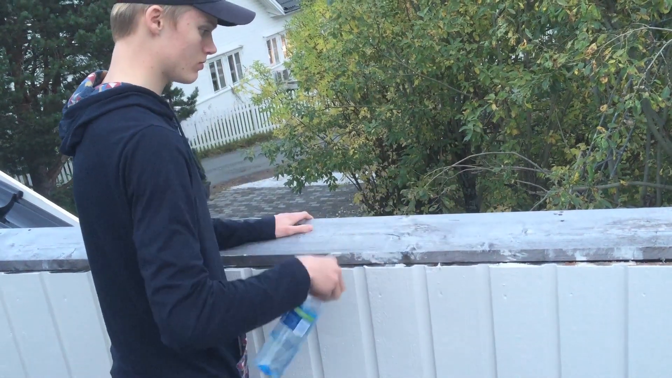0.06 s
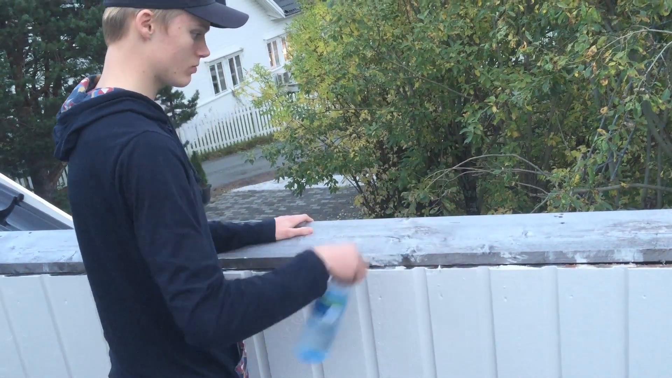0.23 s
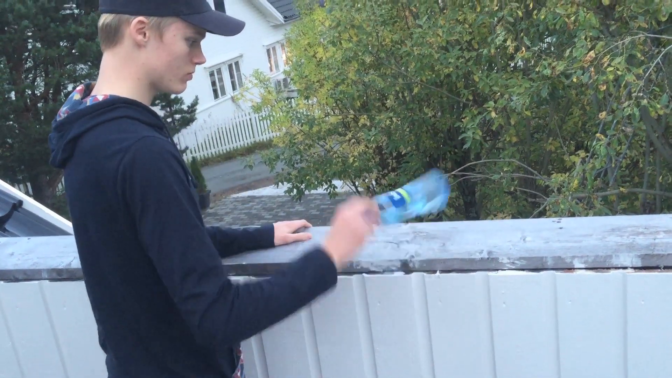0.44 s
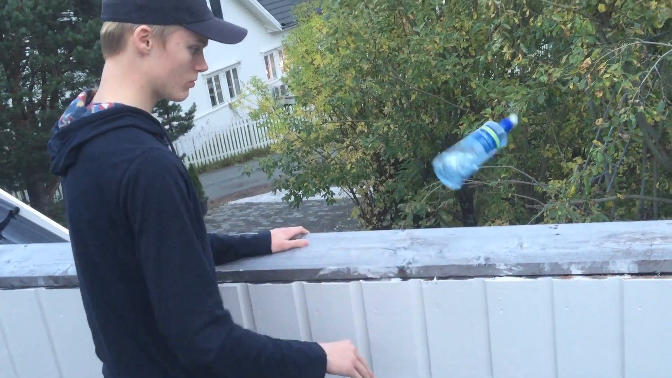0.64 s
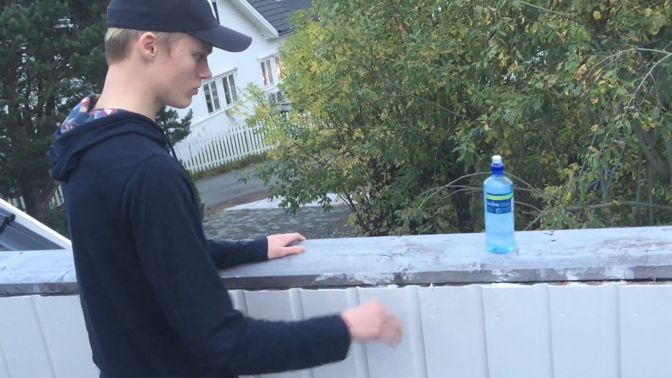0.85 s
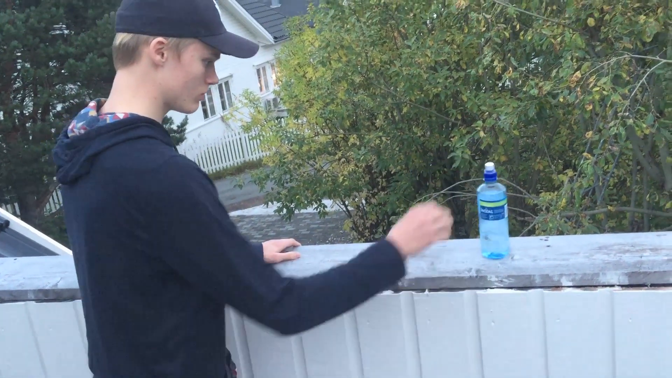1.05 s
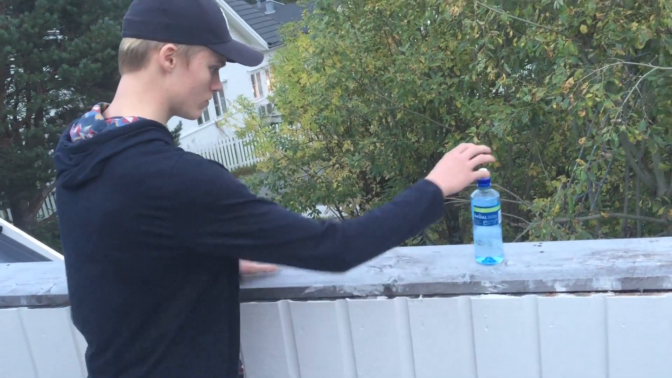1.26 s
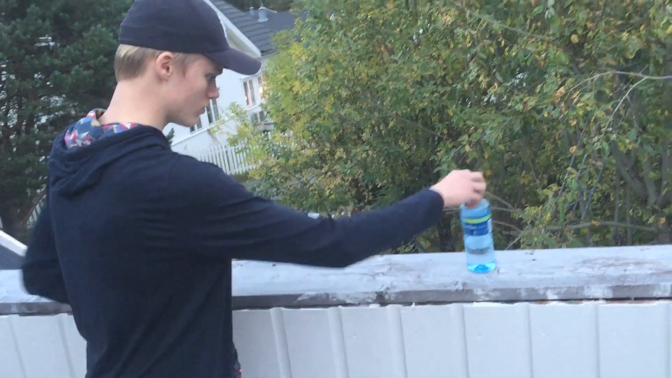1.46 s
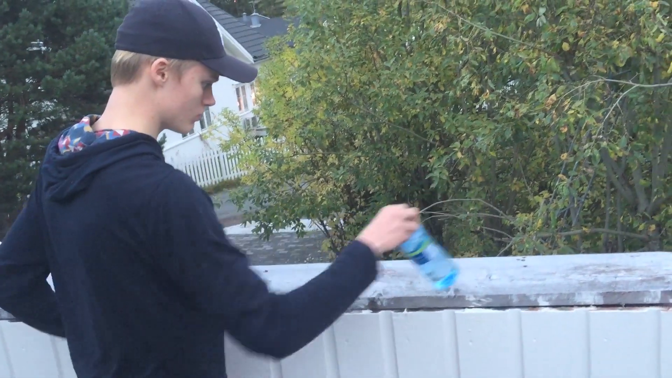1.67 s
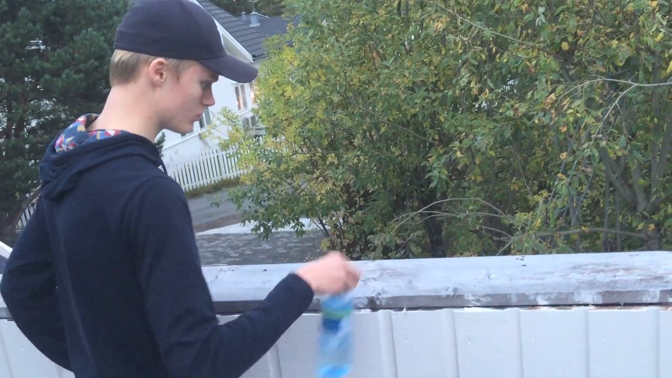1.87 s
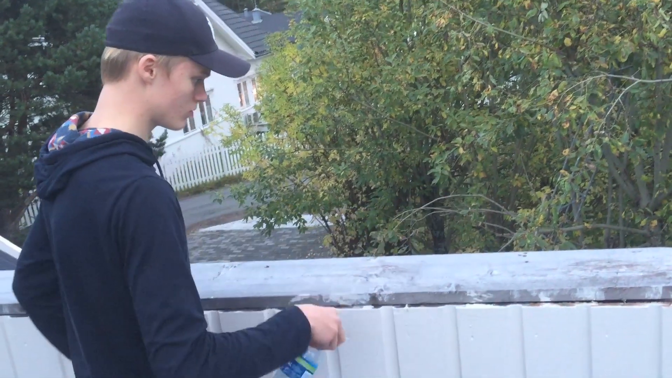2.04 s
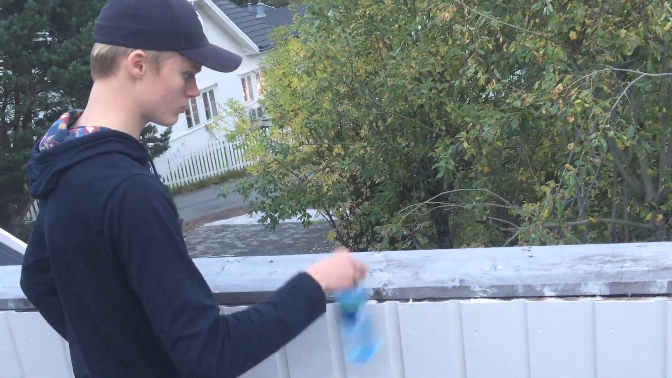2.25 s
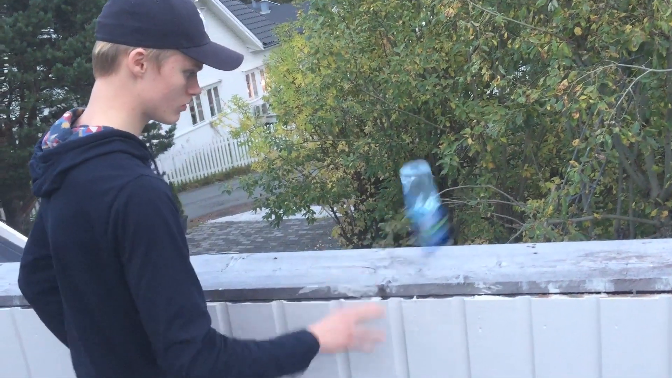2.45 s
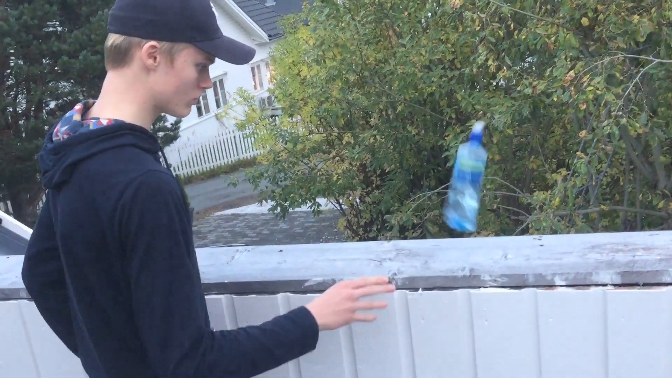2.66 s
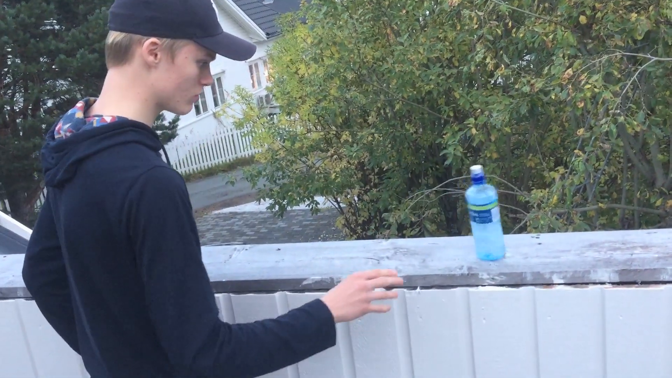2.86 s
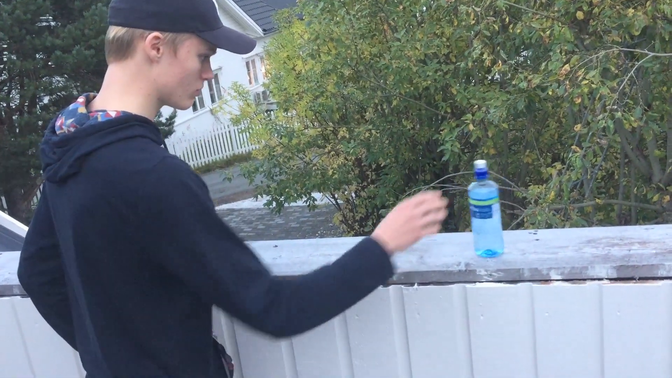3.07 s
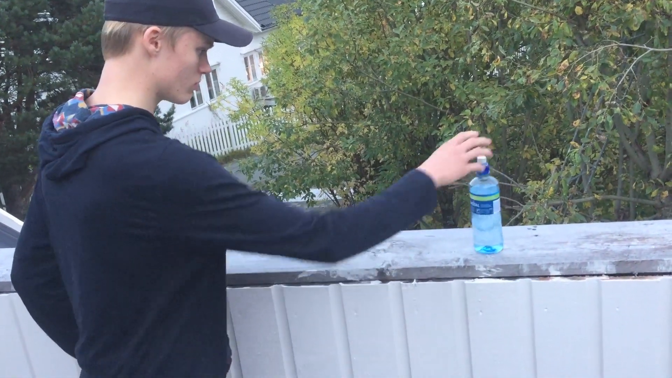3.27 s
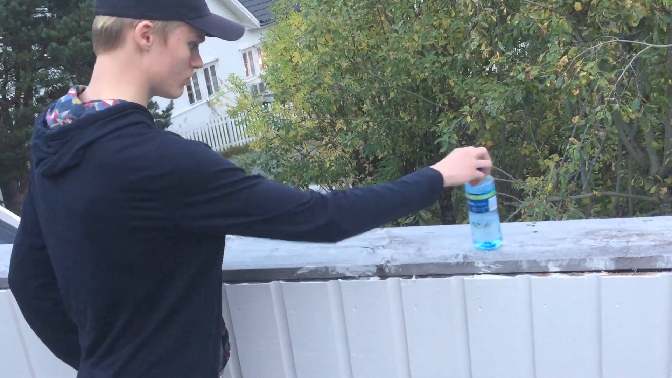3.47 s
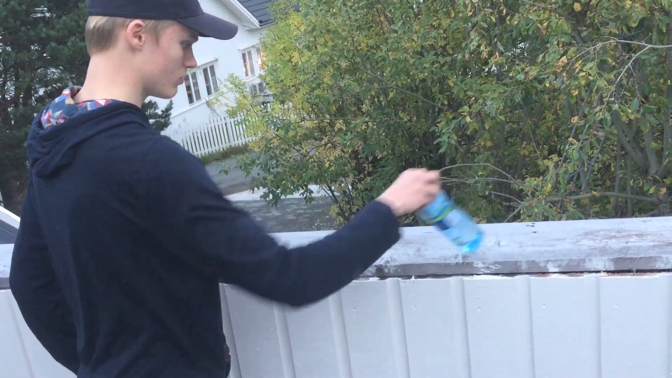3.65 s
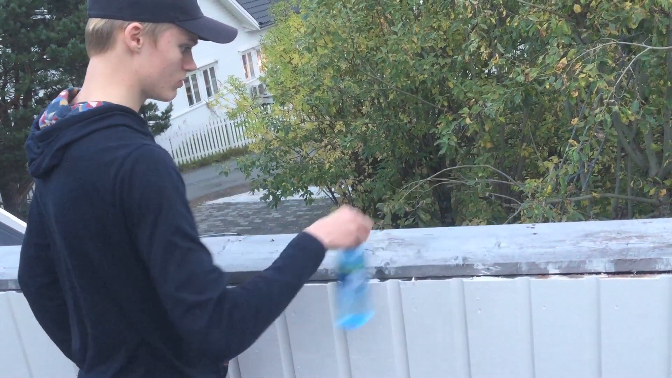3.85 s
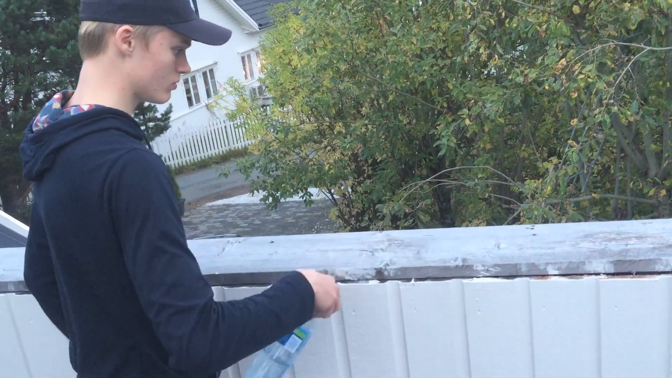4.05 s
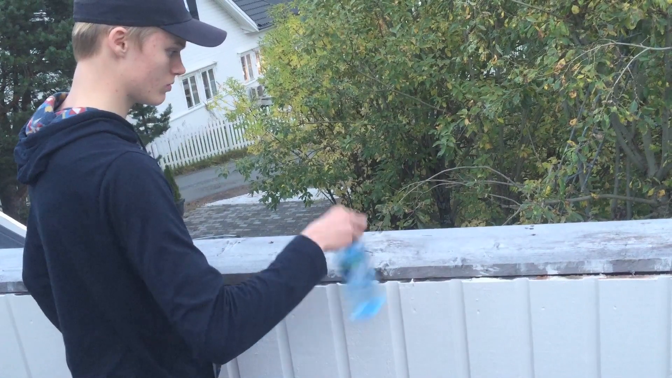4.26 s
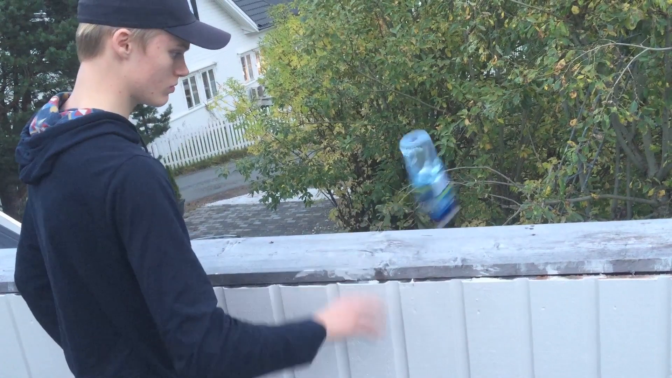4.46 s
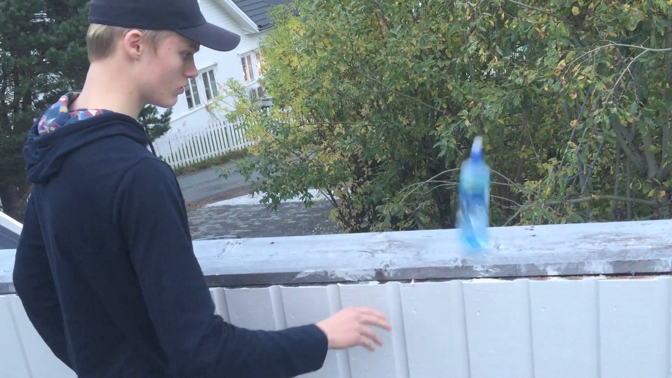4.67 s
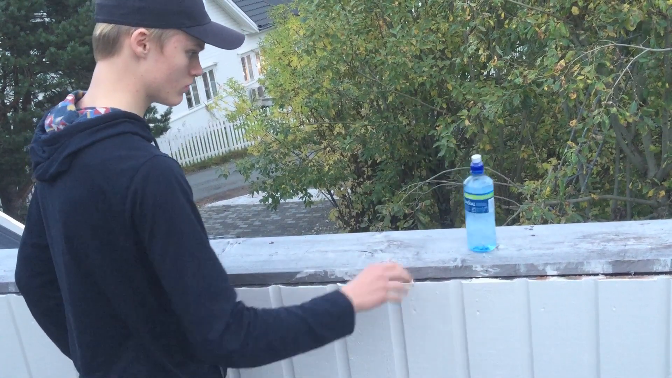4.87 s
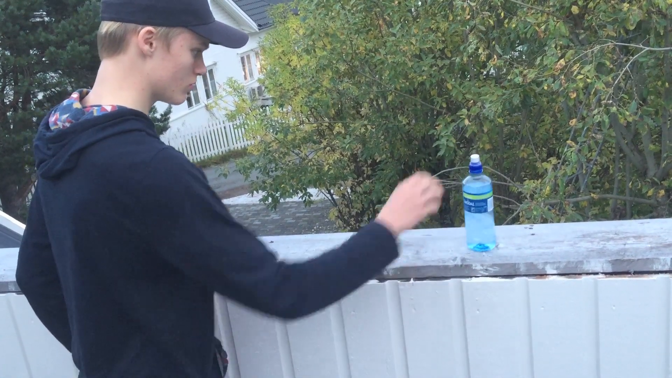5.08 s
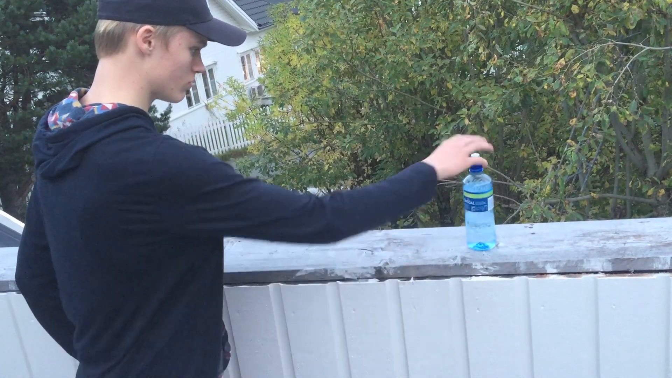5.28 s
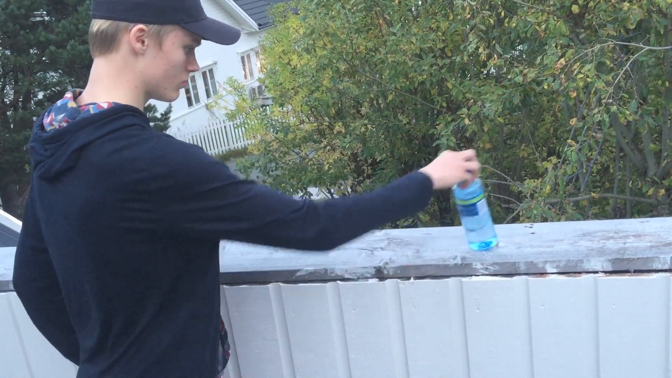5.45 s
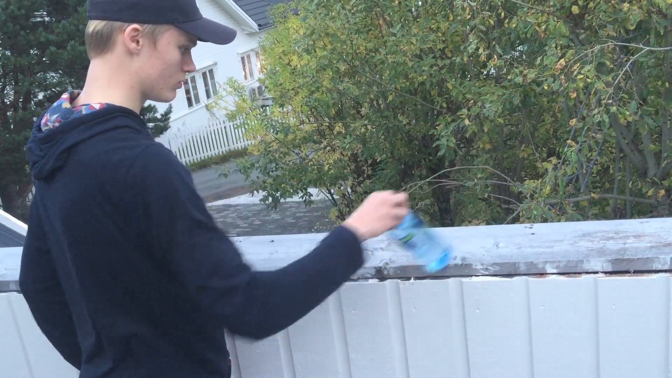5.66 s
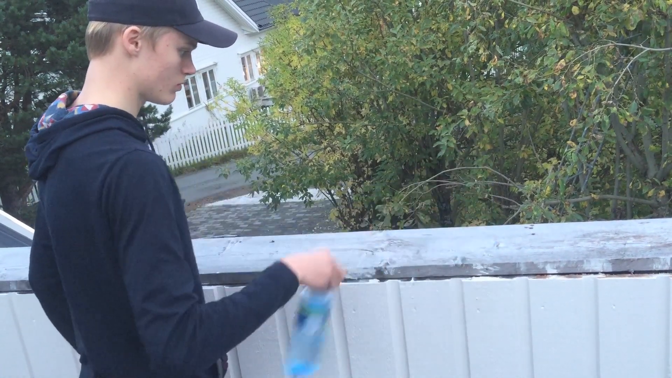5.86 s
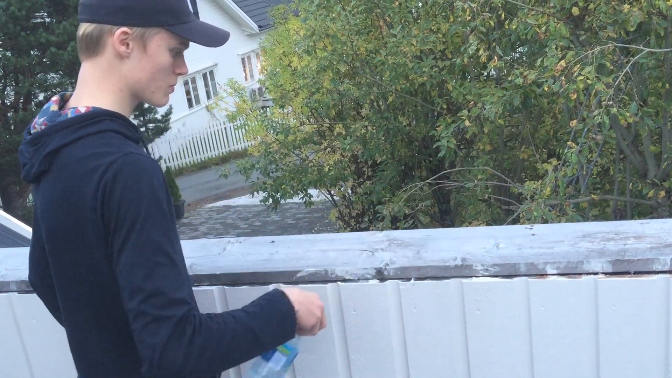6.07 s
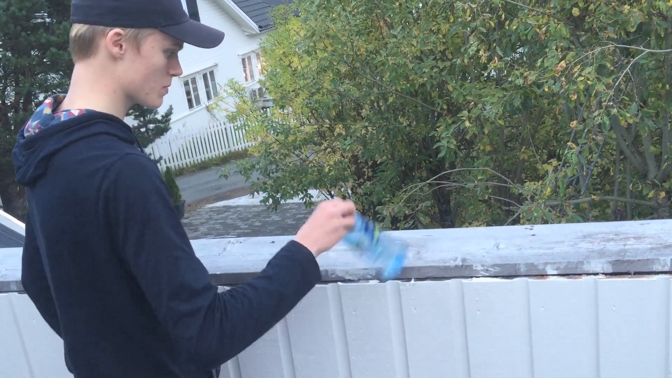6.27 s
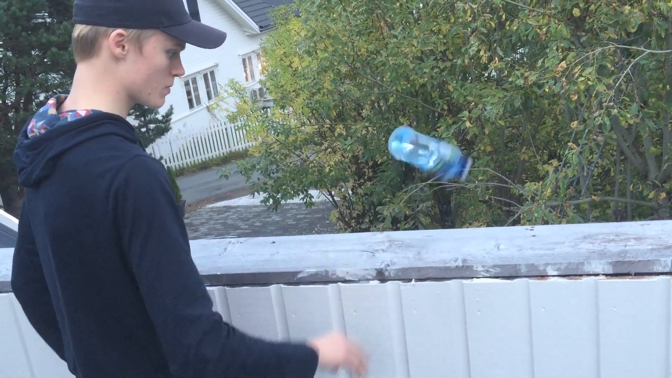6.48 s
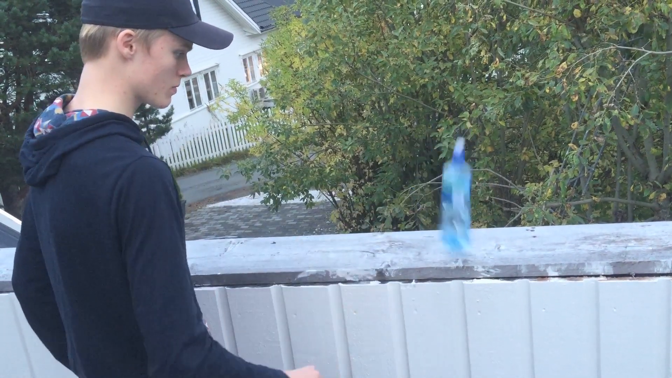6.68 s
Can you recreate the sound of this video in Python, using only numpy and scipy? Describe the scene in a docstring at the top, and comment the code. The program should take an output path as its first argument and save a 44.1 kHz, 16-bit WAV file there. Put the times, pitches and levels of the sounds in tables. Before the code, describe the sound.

Quiet outdoor air with soft, uneven distant road noise and a faint low engine hum that slows and fades by about 2.3 seconds. At 0.6 to 0.8 seconds, light water slaps and small hisses come from a tossed plastic bottle. At 0.94 it lands on a wooden fence top: a very sharp plastic crack, hollow low boom, splashy burst and brief panel shake, with tiny rocking knocks. Around 1.1 to 1.3 there is a barely audible sinking tone and a finger swish. Water slaps again at 2.55 to 2.7, then a second landing at 2.87, softer and duller, more thud than crack, with faint knocks trailing past 3 seconds. Sparse ticks follow. Sloshing at 4.4 to 4.75 precedes the third landing at 4.86, a bright, hard clatter of several contacts with a woody boom. Small settling knocks fade by 5.2. Quiet road noise remains until a fourth throw sloshes from 6.5 to 6.7, with no landing.

```python
"""In a yard, a part-filled plastic bottle is flipped onto the top board of a wooden fence: three landings and
a fourth throw. The base cracks on the board and the fence booms, both as struck banks of decaying sines, while
posts and panels shake on as dying noise. Water and fingers make slaps (short bubble rings with grit), hollow
bonks (pairs of decaying sines), hisses (shaped noise) and one faint sinking tone. Behind them lie distant road
noise, patchy and slowly swelling, and an engine rumble of two wavering sines that slows and fades."""
import sys
import numpy as np
from scipy import signal
from scipy.io import wavfile
from scipy.ndimage import uniform_filter1d

SR = 44100
rng = np.random.default_rng(int(sys.argv[2]) if len(sys.argv) > 2 else 0)


def wav_record(signal):
    """Record a signal, one row per channel, as 16-bit PCM in the file named by sys.argv[1]."""
    frames = np.transpose(np.atleast_2d(signal))
    bounded = np.clip(frames, -1, 1)
    # unit amplitude maps onto the largest positive 16-bit level
    quanta = np.round(bounded * 32767).astype(np.int16)
    wavfile.write(sys.argv[1], SR, quanta)


def makeup_ratio(level_db):
    """Linear amplitude ratio for a level in decibels (20 dB per factor of ten)."""
    decades = np.asarray(level_db, float) / 20
    return 10 ** decades


N = 296352


def evened(x):
    """Power normalisation: scales to rms 1."""
    return x / np.sqrt(np.mean(x ** 2) + 1e-20)


def peaked(x, db):
    """Peak normalisation: scales to a peak level in dB."""
    return makeup_ratio(db) * x / abs(x).max()


def read(points, hz):
    """Logarithmic pitch scale: interpolates a table along log frequency."""
    f, value = np.transpose(points)
    return np.interp(np.log(hz + 1), np.log(f + 1), value)


def add(mix, s, sound):
    """Superposition: adds a sound to the mix from time s."""
    part = mix[round(s * SR):][:len(sound)]
    part += sound[:len(part)]


def noise(count, shape, size):
    """Spectral shaping: random short-time spectra under the magnitude shape(hz, t)."""
    hop = size // 4
    frames = count // hop + 5
    hz = np.fft.rfftfreq(size, 1 / SR)[:, None]
    t = np.arange(frames) * hop / SR
    real, imaginary = rng.standard_normal((frames, len(hz), 2)).T
    spectra = (real + 1j * imaginary) * shape(hz, t)
    return signal.istft(spectra, nperseg=size, noverlap=size - hop)[1][:count]


def patches(hz, t, bins, frames):
    """Random modulation: rms-1 patches, smoothed over so many frequency bins and time frames."""
    grain = rng.standard_normal((len(t), len(hz)))
    across = uniform_filter1d(grain, size=bins, axis=1)
    return evened(uniform_filter1d(across, size=frames, axis=0)).T


def ring(modes, count, weight=lambda hz: 1, sense=1):
    """Modal synthesis: sums decaying sines; mode k is scaled by sense ** k, so a negative sense alternates signs."""
    t = np.arange(count) / SR
    total = np.zeros(count)
    for k, (hz, db, t60) in enumerate(modes):
        total += sense ** k * weight(hz) * makeup_ratio(db - 60 * t / t60) * np.sin(2 * np.pi * hz * t)
    return total


def favour(ring_hz, rest, spread):
    """Point excitation: the spot struck drives the modes near one pitch more than the rest."""
    return lambda hz: rest + np.exp(-(np.log(hz / ring_hz) / spread) ** 2)


def lasting(t60, hz):
    """Frequency-dependent damping: scales a time given for 2 kHz; higher rings die sooner."""
    return t60 * (hz / 2000) ** -0.34


# The base of the bottle snapping on the board, edge by edge. Each row: start in seconds, peak level in dB,
# most strongly excited ring in Hz, grit peak in dB relative to the ring.
BASE_CRACKS = [(0.9407, -14.5, 3500, 2), (0.9411, -4.5, 1870, -9), (.9428, -8.5, 851.4, -15),
               (.956, -24, 2820, -9), (0.962, -19, 2300, -8.5), (0.97, -24.5, 2850, -7),
               (.981, -29, 1495, -11.5), (2.8737, -28, 2700, 5), (2.876, -19.5, 930, -13.5),
               (2.8782, -19, 2100, -7.5), (2.89, -29, 1666, -16), (2.894, -34, 3300, -2),
               (2.913, -34, 2500, -9), (2.921, -41.5, 2140, -8), (4.857, -14.5, 5500, -5),
               (4.858, -12.5, 1870, -16.5), (4.8583, -13.5, 3725, -12), (4.861, -15, 1490, -19.5),
               (4.869, -16.5, 1490, -15), (4.881, -19, 1607, -13.5), (4.892, -31.5, 1900, -10)]
# Modes of the plastic base. Each row: frequency in Hz, level in dB before the strike weights it,
# free decay time (t60) in seconds.
BASE_MODES = [(726, -10, 0.047), (930, -3.5, 0.11), (1312, -6, 0.041), (1490, -10.5, 0.05),
              (1870, -4, 0.019), (2300, -5.5, 0.01), (2700, -6.5, 0.026), (3140, -11, 0.016),
              (3600, -10, 0.03), (3900, -12, 0.016), (5370, -4, 0.022), (6140, -3.5, 0.0095),
              (6800, -17, 0.034), (8720, 5.5, 0.0019), (11640, -11, 0.0052), (14600, -30.5, .006)]
CRACK_S = 0.023  # time scale of a crack at 2 kHz; each part decays in its own proportion to it


def cracks(mix):
    """Impact excitation: a sharp contact with a little chatter rings the plastic; grit on the board spits."""
    t = np.arange(3000) / SR
    draws = rng.standard_normal((len(BASE_CRACKS), 2, len(t)))
    for (s, db, ring_hz, grit_db), (chatter, grit) in zip(BASE_CRACKS, draws):
        scale_s = lasting(CRACK_S, ring_hz)
        contact = (t == 0) + 0.45 * chatter * makeup_ratio(-60 * t / (0.43 * scale_s))
        plastic = ring(BASE_MODES, len(t), favour(ring_hz, 0.1, 0.26), sense=-1.02)
        body = signal.fftconvolve(contact, plastic)[:len(t)] * makeup_ratio(-15 * t / scale_s)
        spit = signal.lfilter([1], [1, -0.4], grit) * makeup_ratio(-60 * t / (0.13 * scale_s))
        add(mix, s, peaked(peaked(body, 0) + peaked(spit, grit_db), db))


# The weight of the water pushing on the board, at landing and as the bottle rocks. Each row: start in seconds,
# peak level in dB before the bass cut, most strongly excited ring in Hz.
WATER_KNOCKS = [(.943, -10, 230), (.948, -11, 480), (0.951, -9.5, 340), (.957, -18.5, 125),
                (0.964, -11.5, 390), (0.974, -26.5, 122), (0.99, -23.5, 122), (1.02, -35.5, 315),
                (1.044, -38, 97), (1.071, -45, 122), (1.109, -46, 110.4), (1.151, -38.5, 182),
                (1.191, -45, 110.9), (1.24, -52, 150), (2.879, -18.5, 212), (2.8854, -12, 112.3),
                (2.894, -17, 240), (2.919, -17.5, 315), (2.937, -20.5, 122), (2.971, -30.5, 122),
                (3.011, -33, 180), (3.06, -31.5, 110.4), (3.12, -40, 180), (3.181, -42.5, 169.2),
                (3.25, -42.5, 101), (3.298, -43.5, 97), (3.392, -51, 97), (3.445, -48, 130),
                (3.522, -45.5, 103.6), (4.861, -16.5, 212), (4.869, -13, 212), (4.879, -15.5, 132.4),
                (4.890, -16, 315), (4.901, -18, 385), (4.922, -24, 131), (4.949, -36, 97), (4.99, -49, 131),
                (5.038, -36, 202.3), (5.082, -38.5, 150), (5.131, -40.5, 180), (5.188, -45, 97),
                (5.509, -52.5, 68.54)]
# Modes of the fence. Each row: frequency in Hz, level in dB before the push weights it, decay time (t60) in seconds.
FENCE_MODES = [(66, -13, 0.24), (97, -6, 0.083), (122, -0.5, 0.15), (150, -11.5, 0.43), (180, -8, 0.45),
               (212, -4, 0.09), (240, -11.5, 0.14), (262, -8, 0.073), (315, -1.5, 0.23), (340, -2.5, 0.09),
               (385, -3.5, .12), (435, -12, 0.1), (490, -3.5, 0.13), (530, -16.5, 0.03), (610, -9.5, .08),
               (620, -20.5, 0.073)]
HARD_MS, DOUBLING_DB = 0.8, 16  # contact time at 0 dB, and the drop in level that doubles it


def knocks(mix):
    """Contact-time filtering: a half-sine push rings the fence; a longer contact leaves only the low modes."""
    bass_cut = signal.butter(2, 70, "high", fs=SR, output="sos")  # the knocks carry little deep bass below 70 Hz
    for s, db, ring_hz in WATER_KNOCKS:
        contact_ms = HARD_MS * 2 ** (-db / DOUBLING_DB)
        samples = SR * contact_ms / 1000
        push = -np.sin(np.pi * np.arange(0.5, samples) / samples)  # first away from the microphone
        board = ring([(230, 2.2, 0.014)], 22000)  # the top board bends once and stops
        fence = ring(FENCE_MODES, len(board), favour(ring_hz, 0.13, 0.09))
        both = signal.fftconvolve(board + fence, push)
        add(mix, s, signal.sosfilt(bass_cut, peaked(both, db)))


# Posts and panels shaking on after each landing. Each row: start in seconds, level in dB
# (rms of the first 2000 samples before the soft onset), factor on the decay times.
FENCE_SHAKES = [(.945, -28, 1.2), (2.882, -30.5, 1.23), (4.862, -28.5, 1.2)]
# Spectrum of the shaking. Each row: frequency in Hz, relative level in dB per Hz.
SHAKE_SPECTRUM = [(35, -39.5), (60, -11.5), (97, -4), (138, 0.5), (259, -16), (329, -5.5), (665, -29.5),
                  (831, -29), (911, -21), (1040, -32.5), (1810, -31.5), (2060, -34), (4000, -41.5),
                  (5000, -48.5), (6500, -77), (11000, -120)]
# Damping of the shaking. Each row: frequency in Hz, decay time (t60) in seconds before the factor.
SHAKE_DECAY = [(60, 0.53), (160, 0.3), (400, 0.24), (900, 0.31), (2000, 0.11), (5000, 0.16)]


def shakes(mix):
    """High modal density: with too many panel modes to count, the tail is noise that dies band by band."""
    t = np.arange(SR) / SR
    onset = 1 - np.exp(-t / 0.0024)
    for s, db, longer in FENCE_SHAKES:
        def dying(hz, u):
            return makeup_ratio(read(SHAKE_SPECTRUM, hz) - 60 * u / (longer * read(SHAKE_DECAY, hz)))

        tail = noise(SR, dying, size=512)
        add(mix, s, makeup_ratio(db) * tail / tail[:2000].std() * onset)


# Water slapping the wall, and finger ticks. Each row: start in seconds, peak level in dB, ring in Hz.
WATER_SLAPS = [(0.6323, -49.5, 1880), (0.633, -46.5, 5580), (0.6893, -52.5, 9600), (0.7014, -57, 6500),
               (0.7294, -46, 3060), (0.7299, -36.5, 5900), (0.7643, -40.5, 2820), (0.7924, -52, 6370),
               (0.8066, -47, 2020), (0.8124, -49.5, 1920), (1.195, -58, 754), (1.2101, -58, 4400),
               (1.2198, -53, 2220), (2.5374, -49, 4140), (2.559, -49, 4590), (2.6214, -62, 9500),
               (2.6427, -52, 3400), (2.6595, -59, 4940), (2.6561, -44.5, 2030), (2.688, -58, 2980),
               (2.6974, -42.5, 5390), (2.7114, -50.5, 2690), (3.0244, -62, 5500), (3.1153, -54, 2140),
               (3.1502, -62.5, 6500), (3.6042, -58, 1690), (3.8194, -68, 7020), (4.4184, -54.5, 1862),
               (4.419, -59, 2700), (4.5464, -43, 4020), (4.6408, -45, 3340), (4.6419, -55, 6010),
               (4.6868, -52, 4060), (4.7014, -51, 5960), (4.7192, -46, 1870), (4.7671, -64, 8850),
               (4.9611, -51.5, 8080), (5.0948, -52, 6020), (5.0953, -51, 2170), (5.1214, -52, 1690),
               (5.5059, -62, 4530), (5.5494, -64.5, 6200), (6.5172, -51.5, 1810), (6.536, -49.5, 3900),
               (6.623, -60, 1920), (6.6408, -45, 5700), (6.6418, -41, 2920), (6.6558, -45.5, 2390),
               (6.675, -54, 3000), (6.689, -63, 2740), (6.7154, -61, 4640)]
SLAP_S, SPIT_DB = 0.065, -8  # time scale at 2 kHz; peak of the spit relative to the ring


def slaps(mix):
    """Bubble resonance: a trapped bubble and its neighbours ring briefly; droplets spit over a wide band."""
    t = np.arange(4000) / SR
    wide = signal.butter(1, [1500, 7000], "band", fs=SR, output="sos")
    grits = rng.standard_normal((len(WATER_SLAPS), len(t)))
    neighbours = rng.uniform(0.75, 1.6, (len(WATER_SLAPS), 3))  # pitch ratios to the main bubble
    for (s, db, hz), grit, ratios in zip(WATER_SLAPS, grits, neighbours):
        scale_s = lasting(SLAP_S, hz)
        spit = signal.sosfilt(wide, grit) * makeup_ratio(-60 * t / (0.45 * scale_s))
        push = (t == 0) + 0.36 * grit * makeup_ratio(-60 * t / (0.5 * scale_s))
        bubbles = [(hz, 0, 0.35 * scale_s)] + [(hz * ratio, -8, 0.5 * scale_s) for ratio in ratios]
        tone = signal.fftconvolve(push, ring(bubbles, len(t)))[:len(t)]
        add(mix, s, peaked(peaked(tone, 0) + peaked(spit, SPIT_DB), db))


# Hollow bonk of the bottle when water or a finger jolts it. Each row: start in seconds, peak level in dB,
# frequency in Hz, overtone level in dB relative to the fundamental.
BOTTLE_BONKS = [(0.625, -51, 199.5, 0), (0.635, -47, 220, -12), (1.536, -61, 370.6, -12.5),
                (2.307, -55, 187, -13), (2.557, -45.5, 204.6, -2.5), (2.789, -51, 195, -13),
                (2.819, -55.5, 207, -15), (4.187, -53, 193.6, -14), (4.209, -53.5, 203.6, -11),
                (4.415, -48.5, 226, -18.5), (4.448, -51, 202, -19.5), (4.534, -52, 232, -7),
                (4.629, -51.5, 201, -21), (4.658, -52.5, 202, -23), (6.521, -53.5, 222, -6),
                (6.54, -56.5, 210, -21)]
BONK_T60_S = 0.12


def bonks(mix):
    """Cavity resonance: the air in the bottle swells for a few cycles, with its odd overtone."""
    t = np.arange(8000) / SR
    onset = 1 - np.exp(-t / 0.0024)
    for s, db, hz, overtone_db in BOTTLE_BONKS:
        modes = [(hz, 0, BONK_T60_S), (2.75 * hz, overtone_db, 0.7 * BONK_T60_S)]
        add(mix, s, peaked(ring(modes, len(t)) * onset, db))


# Colour shared by all the water hisses. Each row: frequency in Hz, relative level in dB per Hz before the tilt.
SPRAY_SPECTRUM = [(530, -37.5), (900, -4), (1040, -6), (1150, -3.5), (1370, -13), (1850, -2), (2330, -8),
                  (2960, -5), (4310, -13.5), (5550, -14.5), (10600, -29.5), (15100, -28), (16000, -41.5)]


def spray(mix, s, db, tilt, ring_hz, rise, fall, rest):
    """Modulated noise: patchy hiss, lumpy with droplets, rises to its peak at s and falls, in dB per s."""
    lead = round(30 / rise * SR)  # the rise starts 30 dB down
    t = (np.arange(15000) - lead) / SR

    def patchy_colour(hz, u):
        tilted = makeup_ratio(read(SPRAY_SPECTRUM, hz) + tilt * np.log2((hz + 1) / 4000))
        colour = tilted * favour(ring_hz, rest, 0.12)(hz + 1)
        return colour * makeup_ratio(2.9 * patches(hz, u, bins=5, frames=7))

    hiss = noise(len(t), patchy_colour, size=256)
    drops = makeup_ratio(1.8 * evened(uniform_filter1d(rng.standard_normal(len(t)), size=110)))
    envelope = makeup_ratio(db + np.minimum(rise * t, -fall * t))
    add(mix, s - lead / SR, envelope * evened(hiss * drops))


# Fingers sliding off the cap, water washing back. Each row: peak time in seconds, level in dB,
# brightness in dB per octave, ring in Hz.
SWISH_SWELLS = [(.636, -62.5, 8.5, 4200), (1.221, -56.5, -6, 3800), (2.56, -63.5, 6.5, 4100),
                (4.55, -63, 6.5, 3900), (5.1, -63, 0, 2350), (6.541, -65, 7.5, 4020)]
# Water thrown against the wall in flight. Each row: peak time in seconds, level in dB,
# brightness in dB per octave, ring in Hz, fall in dB per second.
WALL_SPLASHES = [(0.73, -47, 9, 3600, 520), (.761, -53, 2.5, 2590, 289), (2.642, -63, 1.5, 3420, 300),
                 (2.656, -53, 3, 2250, 350), (2.688, -47.5, 3, 3400, 370), (4.641, -51, 1.5, 3040, 548.5),
                 (4.69, -66, 10, 3200, 150), (4.719, -52.5, 0.5, 1950, 550.5), (6.626, -63, 8.5, 2780, 150),
                 (6.64, -53.5, 3.5, 2720, 281)]
# Spray at each landing, a burst over a longer wash. Each row: peak time in seconds, burst level in dB,
# wash level in dB, burst brightness in dB per octave, wash brightness in dB per octave.
LANDING_BURSTS = [(0.9426, -20.5, -31, 1.5, -.5), (2.8738, -30.5, -33.5, 1.1, .4),
                  (4.8577, -20.5, -30.5, -0.83, -1.1)]
SWELL_DB_PER_S, SWISH_FALL_DB_PER_S, SUDDEN_DB_PER_S = 229.5, 515, 30000
BURST_FALL_DB_PER_S, WASH_FALL_DB_PER_S, BURST_RING_HZ = 900.5, 278.5, 2050


def sprays(mix):
    """Envelope contrast: swishes swell, splashes strike and fade, a landing bursts at once."""
    for row in SWISH_SWELLS:
        spray(mix, *row, SWELL_DB_PER_S, SWISH_FALL_DB_PER_S, rest=0.59)
    for *row, fall in WALL_SPLASHES:
        spray(mix, *row, SUDDEN_DB_PER_S, fall, rest=0.97)
    for s, burst_db, wash_db, burst_tilt, wash_tilt in LANDING_BURSTS:
        spray(mix, s, burst_db, burst_tilt, BURST_RING_HZ, SUDDEN_DB_PER_S, BURST_FALL_DB_PER_S, rest=2.8)
        spray(mix, s, wash_db, wash_tilt, BURST_RING_HZ, SUDDEN_DB_PER_S, WASH_FALL_DB_PER_S, rest=2.8)


GLIDE_S, GLIDE_LENGTH_S, GLIDE_DB = 1.11, 0.2, -67
GLIDE_HZ, SINK_HZ_PER_S, BREAKS_PER_S = 2320, 1150, 19


def glide(mix):
    """Frequency modulation: a broken, wavering tone, with a weaker partner above, sinks as the water settles."""
    t = np.arange(0, GLIDE_LENGTH_S, 1 / SR)
    n = len(t)
    draws = rng.standard_normal((3, 12000))
    wobble, waver, partner = (evened(uniform_filter1d(v, size=500))[:n] for v in draws)
    turns = np.cumsum((GLIDE_HZ - SINK_HZ_PER_S * t) * (1 + 0.0062 * wobble)) / SR
    tone = makeup_ratio(2.5 * waver) * np.sin(2 * np.pi * turns)
    tone += makeup_ratio(-14 + 3 * partner) * np.sin(2 * np.pi * 1.78 * turns)
    breaks = makeup_ratio(4 * np.cos(2 * np.pi * BREAKS_PER_S * t) - 1.5)
    add(mix, GLIDE_S, makeup_ratio(GLIDE_DB) * breaks * tone * signal.windows.tukey(n, 0.4))


# Spectrum of the road and hiss. Each row: frequency in Hz, relative level in dB per Hz.
ROAD_SPECTRUM = [(18, -47), (30, -22), (55, -0.5), (106, -5.5), (174, -7), (204, -6), (328, -4.5),
                 (449, -10.5), (486, -16), (866, -5), (1320, -14), (1910, -15), (2290, -22.5),
                 (11700, -36.5), (16000, -37)]
# Slow swell of the road. Each row: time in seconds, level in dB.
ROAD_SWELL = [(0, -64), (.5, -65.5), (1.201, -60), (1.8, -65.5), (2.6, -63), (3.3, -63.5), (4.001, -65),
              (4.4, -64.5), (4.55, -61.5), (4.7, -61.5), (4.999, -62), (5.9, -65), (6.4, -62.5),
              (6.72, -59.5)]


def road():
    """Broadband noise: far-off tyre roar with drifting patches, over the microphone hiss."""
    s, db = np.transpose(ROAD_SWELL)

    def drifting(hz, u):
        near = 1 / (1 + (hz / 3000) ** 2)  # only the roar swells, the hiss is steady
        swell = np.interp(u, s, db) - db.mean()
        return makeup_ratio(read(ROAD_SPECTRUM, hz) + near * (swell + 1.8 * patches(hz, u, bins=6, frames=8)))

    return makeup_ratio(db.mean()) * evened(noise(N, drifting, size=2048))


# The engine drawing away. Each row: time in seconds, firing rate in Hz, rms level in dB before the waver.
ENGINE_COURSE = [(0.0, 61, -60.5), (0.1, 60.7, -60), (0.3, 57.3, -70.5), (0.649, 57, -59), (0.9, 55.9, -71),
                 (1.3, 50.4, -76.5), (1.62, 50.8, -66.5), (1.88, 48.25, -74), (2.23, 47.5, -73)]
OCTAVE_DB = -77  # rms before the waver


def engine():
    """Harmonic source: a wavering hum at the firing rate and its octave, slowing and drawing away."""
    s, firing_hz, db = np.transpose(ENGINE_COURSE)
    t = np.arange(N) / SR
    turns = np.cumsum(np.interp(t, s, firing_hz)) / SR
    waver = makeup_ratio(0.96 * evened(uniform_filter1d(rng.standard_normal(N), size=3000)))
    fade = np.clip((s[-1] + 0.1 - t) / 0.1, 0, 1)  # to silence in 0.1 s after the last row
    hum = makeup_ratio(np.interp(t, s, db)) * np.sin(2 * np.pi * turns)
    hum += makeup_ratio(OCTAVE_DB) * np.sin(4 * np.pi * turns)
    return np.sqrt(2) * hum * waver * fade  # sqrt(2) turns rms into sine peak


def scene():
    """Superposition: all sources add at one microphone."""
    mix = road() + engine()
    for source in (cracks, knocks, shakes, slaps, bonks, sprays, glide):
        source(mix)
    return mix[None]


def band_limit(x):
    """A steep low-pass at the top of the band."""
    return signal.sosfilt(signal.butter(12, 17110, fs=SR, output="sos"), x)


def record(dry):
    """High-pass response: the microphone rolls off the deep bass."""
    rolloff = signal.butter(3, 58, "high", fs=SR, output="sos")
    finished = signal.sosfilt(rolloff, dry)
    return band_limit(finished)


dry = scene()
out = record(dry)
wav_record(out)
```